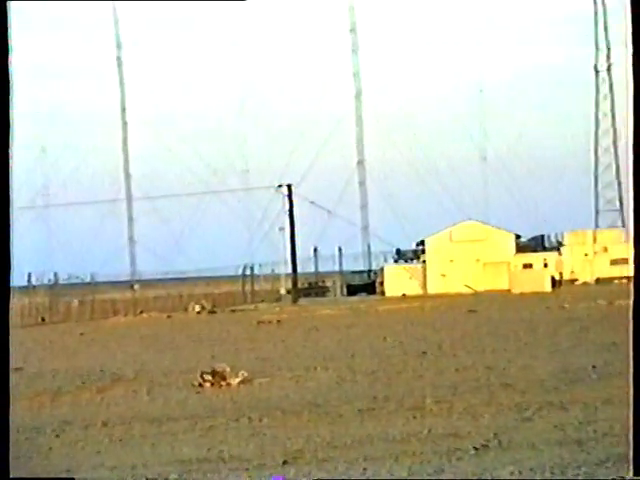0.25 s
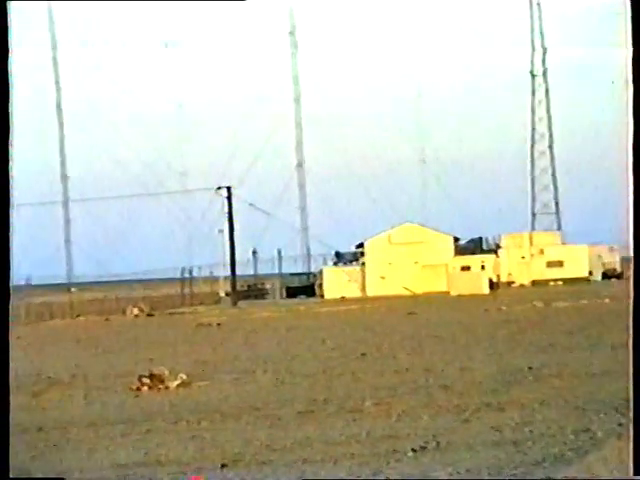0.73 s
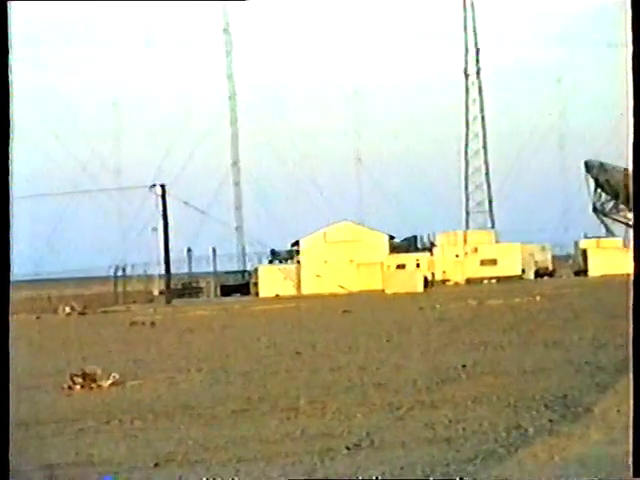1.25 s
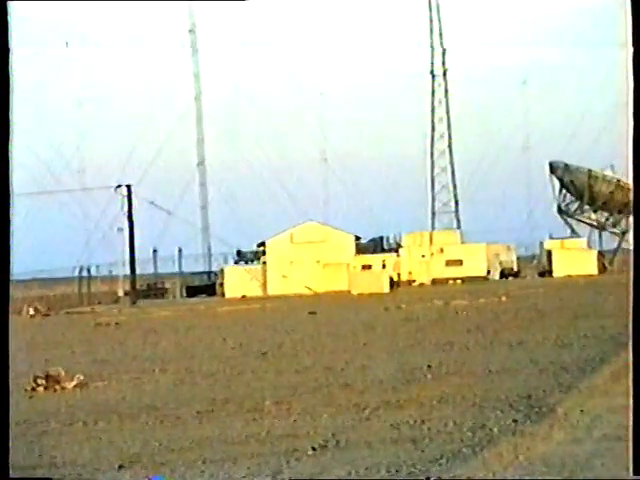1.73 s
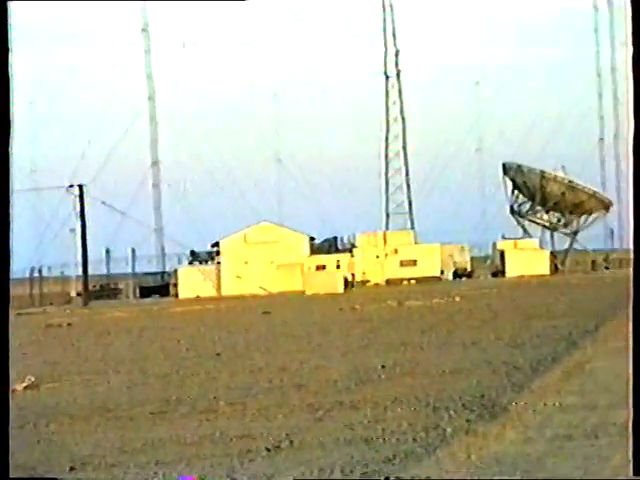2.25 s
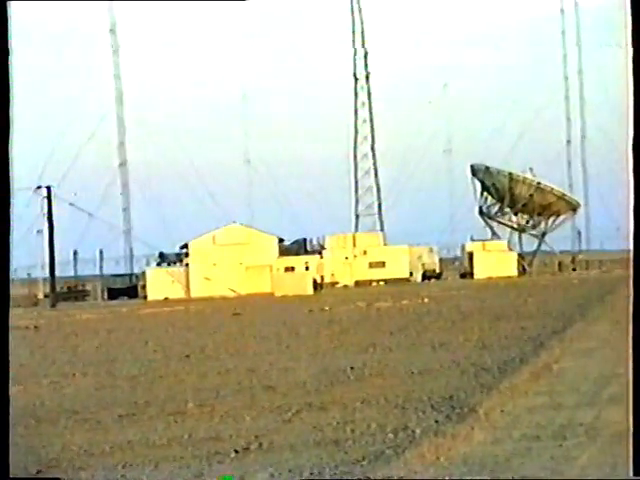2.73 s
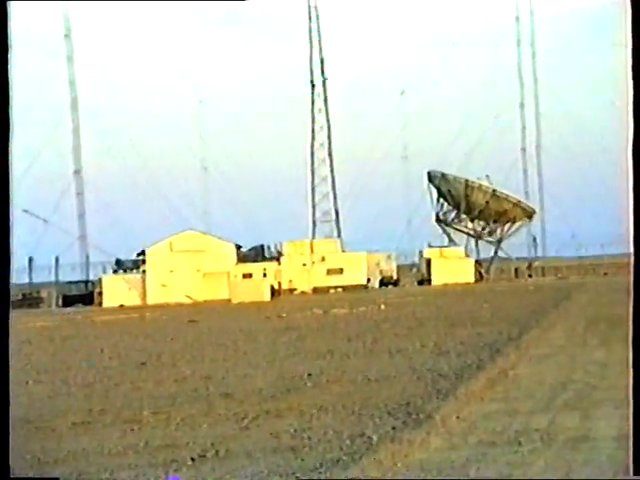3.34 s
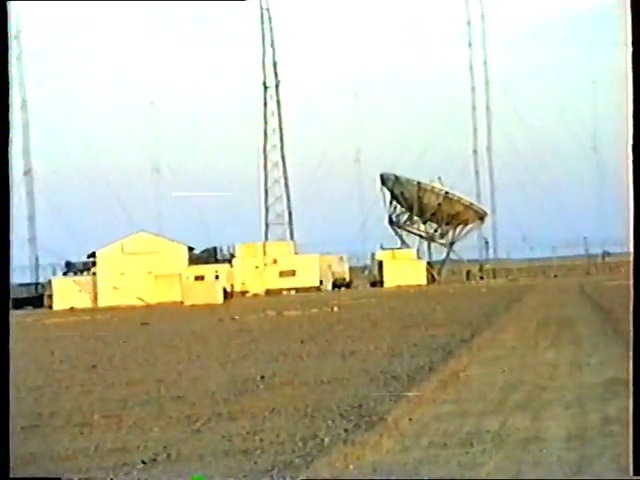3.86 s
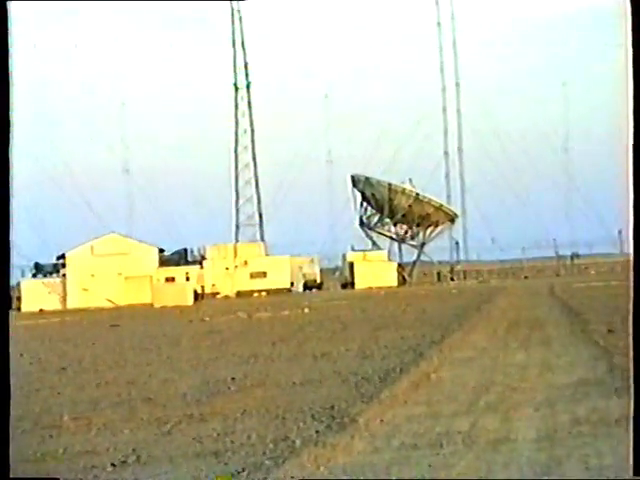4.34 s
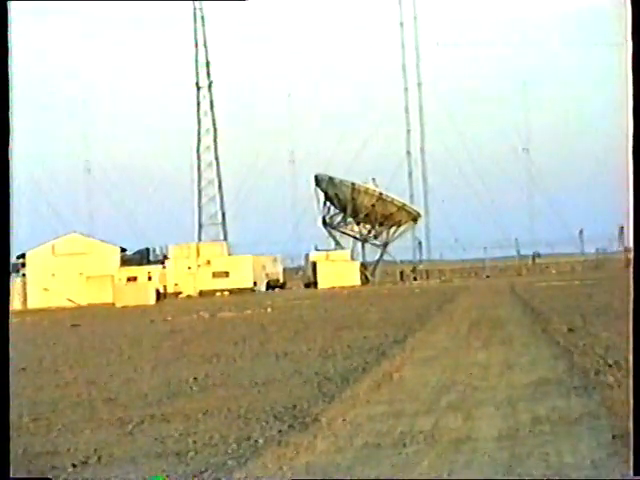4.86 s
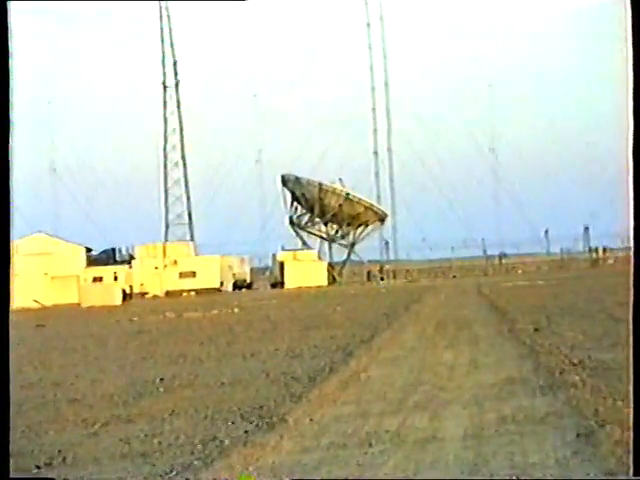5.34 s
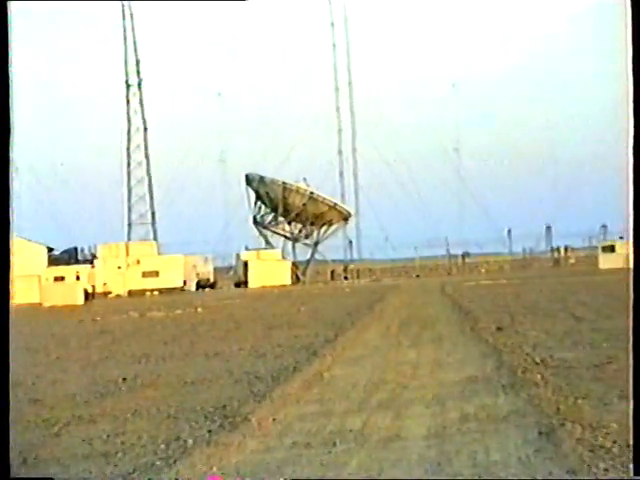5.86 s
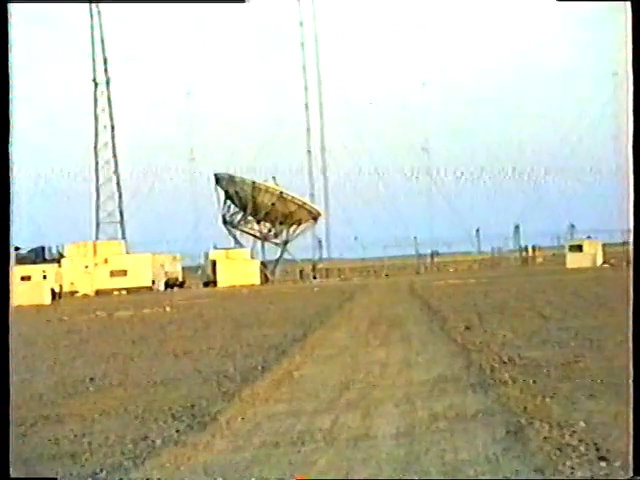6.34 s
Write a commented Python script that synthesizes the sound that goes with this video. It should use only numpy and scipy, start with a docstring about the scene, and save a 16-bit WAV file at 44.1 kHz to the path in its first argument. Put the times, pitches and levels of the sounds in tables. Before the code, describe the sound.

Wind blows straight onto a camcorder microphone in open desert, making a low, uneven rumble full of soft thumps and fluttering flurries. It sounds wide and slightly hollow, eases briefly past the middle, then gusts hardest near the end. Far beneath it are a soft rush of air over the plain and the camera's own faint hiss and whine, with a tiny tick, a light scuff and a brief buzz.

```python
"""Open desert, with the wind blowing straight onto the two microphone ports of a tape camcorder.
Gusts drive a low, uneven rumble with thumps and flurries, wide in the ears and slightly hollow in
the centre. Behind it lies the soft rush of air over the plain. Close by and faint are the camera's
own sounds: hiss, the whine of the tape drum, a thin whistle, a tick, a scuff and a brief buzz."""
import sys
import numpy as np
from scipy import signal
from scipy.fft import rfft, irfft, next_fast_len
from scipy.io import wavfile
from scipy.ndimage import uniform_filter1d

SR = 44100
rng = np.random.default_rng(int(sys.argv[2]) if len(sys.argv) > 2 else 0)


def store_wav(level_fs):
    """Save 16-bit WAV to argv[1]."""
    pcm = np.round(np.clip(np.atleast_2d(level_fs), -1, 1) * 32767)
    wavfile.write(sys.argv[1], SR, pcm.T.astype(np.int16))


N = 290881
TIME = np.arange(N) / SR
SIZE = next_fast_len(N + SR // 10)
FREQS = np.maximum(np.arange(SIZE // 2 + 1) * SR / SIZE, 1)
DRUM_HZ = 150  # turning rate of the tape drum

# single strong eddies that thump the ports:
# (time [s], level [dB], pitch [Hz], half length [s], left minus right [dB])
EDDIES = [(0.29, -21, 130, 0.012, 11), (0.483, -19.5, 127, 0.009, 5), (.547, -22, 124, .009, 12),
          (0.77, -20, 124.3, 0.0081, 19), (0.807, -23, 128.5, .01, 11), (0.947, -19.5, 128, 0.011, 11),
          (.983, -19.5, 123.4, 0.0081, 12), (1.061, -20, 189, 0.018, 1.5),
          (1.151, -20, 129.3, 0.0069, 12.5), (1.182, -22.5, 127, 0.0065, -0.5),
          (1.217, -18, 125.7, 0.0067, 13), (1.47, -20, 126, 0.031, 7), (1.585, -17.5, 124, 0.017, 8),
          (1.778, -20.5, 180, 0.011, 14), (1.842, -19, 122.1, 0.016, 8), (1.888, -20.5, 124.2, 0.014, 0),
          (2.008, -19.5, 136.6, 0.011, 11), (2.201, -28, 128.4, 0.0072, 7), (2.269, -21, 122, 0.023, 4),
          (2.309, -19, 165, 0.0082, -10), (2.437, -22, 124, 0.008, 1), (2.559, -21.5, 128, 0.017, 0),
          (2.609, -18.5, 124, 0.008, -2), (2.648, -20.5, 258, .011, 1.5), (2.789, -17, 123.7, 0.0099, 4.5),
          (2.85, -17.5, 122.2, 0.008, -7), (2.939, -20.5, 181.9, .01, -1.5), (3.007, -16, 127.3, 0.011, -1),
          (3.048, -16, 127.8, 0.011, 9), (3.128, -21.5, 248, 0.013, 9.5), (3.228, -23, 122.9, .01, 8),
          (3.262, -27, 400, .004, 5), (3.276, -19, 123.7, 0.017, 10), (3.506, -25.5, 127, 0.0055, 8),
          (3.68, -20, 123.8, 0.018, -5), (3.79, -21, 215, .011, 1.5), (3.992, -19, 130.8, 0.0077, -5),
          (4.304, -21.5, 128, 0.011, -1.5), (4.492, -13.5, 126.8, 0.018, -2),
          (4.55, -17.5, 129, 0.02, -0.5), (4.602, -16, 127.3, 0.016, -7.5), (4.648, -19.5, 193.2, 0.015, 5),
          (4.809, -22.5, 179.8, 0.01, 1), (4.946, -19.5, 129.9, .016, 3), (5.095, -18.5, 183, 0.011, 3),
          (5.292, -19, 127.2, 0.021, -7), (5.398, -17, 201.3, 0.0062, 8), (5.503, -14, 126, 0.0081, -3),
          (5.645, -17.5, 123.9, .016, -2), (5.717, -14.5, 126.7, 0.012, -3), (5.8, -18.5, 183, 0.008, 0),
          (5.833, -14.5, 125.8, 0.013, -8), (5.92, -22.5, 185.3, 0.017, -2), (5.968, -21, 126, 0.014, 1),
          (5.999, -16.5, 130.2, 0.0081, -1), (6.131, -17, 192, .012, -2.5), (6.23, -14, 132, 0.011, -3),
          (6.332, -16, 186, 0.011, -7.5), (6.524, -19, 122, 0.011, -2.5)]


def undb(db):
    """Decibels to gain."""
    return 10 ** (np.asarray(db) / 20)


def rms(x):
    """Root mean square."""
    return np.sqrt(np.mean(x ** 2))


def curves(table):
    """The columns of a table of timed rows, one value a sample."""
    times, *columns = np.transpose(table)
    return [np.interp(TIME, times, column) for column in columns]


def bump(at_s, half_s):
    """A Gaussian swell and fade around a moment, 1 at the top."""
    out = np.zeros(N)
    near = slice(*np.searchsorted(TIME, [at_s - 5 * half_s, at_s + 5 * half_s]))
    out[near] = np.exp(-.5 * ((TIME[near] - at_s) / half_s) ** 2)
    return out


def colour(points):
    """Gain at every frequency from (frequency [Hz], level [dB]) points."""
    hz, db = np.transpose(points)
    return undb(np.interp(np.log(FREQS), np.log(hz), db))


def bell(hz, octaves):
    """Gain of a smooth band around a centre."""
    return np.exp(-.5 * (np.log2(FREQS / hz) / octaves) ** 2)


def shape(x, gain):
    """Filter a sound by a gain at every frequency."""
    return irfft(rfft(x, SIZE) * gain, SIZE)[..., :N]


def noise(gain):
    """Coloured noise of rms 1."""
    x = shape(rng.standard_normal(SIZE), gain)
    return x / rms(x)


def walk(rate_hz):
    """Random levels held 1 / rate_hz seconds and smoothed twice; rms 1."""
    hold = int(SR / rate_hz)
    steps = np.repeat(rng.standard_normal(N // hold + 1), hold)
    smooth = uniform_filter1d(uniform_filter1d(steps, hold), hold)[:N]
    return smooth / rms(smooth)


def stereo(mid, side):
    """Left and right from their common and opposed parts."""
    return np.array([mid + side, mid - side])


def wide_noise(gain, side_db):
    """Coloured stereo noise, widened by an independent side signal."""
    return stereo(noise(gain), undb(side_db) * noise(gain))


def air(sigh_trim_db=-0.5, sigh_width_hz=240, swell_db=1.0):
    """Air rushes over the plain, mostly in the centre; a broad sigh wanders through it."""
    # swell of the rush: (time [s], level [dB])
    rush_levels = [(0, -64), (.2, -67), (.5, -66.5), (.9, -65), (1.45, -66.5), (2.1, -65.5), (2.8, -65),
                   (3.4, -67.5), (3.9, -64.5), (4.45, -66.5), (5.2, -67), (5.65, -64), (6.1, -66),
                   (6.6, -65.5)]
    # spectrum of the rush: (frequency [Hz], level [dB])
    rush_spectrum = [(200, -7), (900, -1), (1500, 0.5), (2000, -4), (2480, -2.5), (2700, -10), (2950, -7.5),
                     (3350, -17.5), (5000, -26.5), (9000, -45.5)]
    # path of the sigh: (time [s], centre [Hz], level [dB])
    sigh_path = [(0, 1700, -70), (.22, 1646, -74), (.45, 1497, -63.5), (.75, 1423, -68.5), (.95, 1412, -67),
                 (1.5, 1340, -75), (1.9, 1623, -69.5), (2.4, 1750, -73), (2.7, 1648, -66.5),
                 (3.1, 1606, -67), (3.4, 1805, -75), (3.88, 2150, -65.5), (4.45, 1894, -72.5),
                 (5.2, 1900, -71.5), (5.62, 1952, -65), (5.9, 1484, -66.5), (6.3, 1860, -72.5)]
    rush_db, = curves(rush_levels)
    sigh_hz, sigh_db = curves(sigh_path)
    low_band = noise(np.exp(-.5 * (FREQS / sigh_width_hz) ** 2))
    sigh = low_band * np.cos(2 * np.pi * np.cumsum(sigh_hz) / SR)  # shifted up to the moving centre
    rush = undb(rush_db) * wide_noise(colour(rush_spectrum), side_db=-8)
    return (rush + sigh * undb(sigh_trim_db + sigh_db)) * undb(swell_db * walk(9.7))


def whistle(pitch_hz=8000, level_db=-97, waver_db=0.5):
    """A thin steady whistle from the camera's electronics."""
    return np.sqrt(2) * undb(level_db + waver_db * walk(5)) * np.sin(2 * np.pi * pitch_hz * TIME)


def hiss(level_db=-73.5, rasp_depth=0.54, sharpness=6):
    """An even hiss with a slight rasp once per turn of the drum."""
    # spectrum of the hiss: (frequency [Hz], level [dB])
    spectrum = [(1000, -3), (3000, 0.5), (4100, -1.5), (5000, -3), (5700, -6.5), (8000, -8.5),
                (11000, -11.5)]
    rasp = 1 + rasp_depth * np.abs(np.sin(np.pi * DRUM_HZ * TIME)) ** sharpness
    return undb(level_db) * rasp / rms(rasp) * wide_noise(colour(spectrum), side_db=-5)


def drum_whine(wow=.0006, waver_db=1.5, side_db=-7):
    """The spinning tape drum whines through the camera body into the microphone."""
    # partials of the whine: (frequency [multiples of the turning rate], level [dB])
    partials = [(9.7, -83), (10, -81.5), (11, -79), (12, -78), (13, -81), (13.5, -83.5), (15, -86),
                (16, -83.5), (17.5, -83.5), (18.5, -90.5), (19, -90.5), (29, -99), (30, -90.5), (31, -95),
                (32, -95), (33, -97), (34, -93.5), (35, -99.5)]
    angle = 2 * np.pi * np.cumsum(DRUM_HZ * (1 + wow * walk(6))) / SR
    out = 0
    for multiple, db in partials:
        phase = multiple * angle + rng.uniform(0, 2 * np.pi)
        tone = stereo(np.sin(phase), undb(side_db) * np.cos(phase))
        out += undb(db + waver_db * walk(6.4)) * tone
    return np.sqrt(2) * out


def buzz(at_s=3.86, half_s=0.035, level_db=-49, centre_hz=7000):
    """A faint bright buzz swells and fades, two clicks to each turn of the drum."""
    clicks = np.diff(np.floor(2 * DRUM_HZ * TIME), prepend=0)
    swell = undb(level_db) * bump(at_s, half_s)
    return shape(clicks * swell, bell(centre_hz, octaves=0.9))


def handling():
    """Light touches on the camera body, close to the ports: a tick, then a scuff."""
    # touches: (time [s], level [dB], centre [Hz], rise [s], decay [s], left minus right [dB])
    touches = [(2.078, -52, 2700, 0.00017, 0.00069, -2), (2.083, -70.5, 2700, 0.0027, 0.018, -1),
               (3.585, -66, 3800, .0013, 0.0083, 0), (3.59, -59.5, 2040, .006, 0.017, 5),
               (3.612, -62, 2000, .002, .012, 7)]
    out = 0
    for at_s, db, hz, rise_s, decay_s, pan_db in touches:
        age = np.maximum(TIME - at_s, 0)
        envelope = np.minimum(age / rise_s, 1) * np.exp(-np.maximum(age - rise_s, 0) / decay_s)
        gains = undb(db + np.array([[pan_db], [-pan_db]]) / 2)
        out += gains * envelope * wide_noise(bell(hz, octaves=0.6), side_db=-7)
    return out


def sizzle(rumble, pitch_hz=3900, pitch_db=-48.5, octave_db=-66):
    """A thin high sizzle rides on the gusts: sidebands of the rumble around a pitch and its octave."""
    phase = 2 * np.pi * pitch_hz * TIME
    return rumble * (undb(pitch_db) * np.cos(phase) + undb(octave_db) * np.cos(2 * phase))


def thumps(trim_db=-2.67, wobble=.12, skew=0.53, lag_rad=0.73):
    """Each strong eddy swings the pressure for a few lopsided cycles, harder and sooner at one port."""
    out = np.zeros((2, N))
    sides = np.array([[1], [-1]])
    uneven_time = np.cumsum(1 + wobble * walk(110)) / SR
    for at_s, db, hz, half_s, pan_db in EDDIES:
        near = np.abs(TIME - at_s) < .1
        lead = lag_rad * np.tanh(pan_db / 2) * sides
        phase = 2 * np.pi * (hz * uneven_time[near] + rng.random()) + lead
        swing = np.sin(phase + skew * np.sin(phase))
        pan = undb(sides * pan_db / 2)
        out[:, near] += undb(db + trim_db) * pan / pan.mean() * bump(at_s, half_s)[near] * swing
    return out


def slack_db(dip_db=-0.5, lead_s=0.038, dip_half_s=0.008, cover_db=-2.5):
    """The rumble slackens just before a thump and gives way while the eddy covers the port."""
    times = np.array(EDDIES)[:, 0]
    fresh = np.diff(times, prepend=0) > .07  # no other eddy has just struck
    before = sum(bump(at_s - lead_s, dip_half_s) for at_s in times[fresh])
    covered = sum(bump(at_s, half_s) for at_s, _, _, half_s, _ in EDDIES)
    return dip_db * before + cover_db * covered


def port(gust_db, fine_db, deep_db, split_hz=360, deep_hz=85, throb_db=1.5, flutter_db=1.05):
    """Turbulence at one microphone port: the largest eddies boom, big ones thud, small ones flutter."""
    # pressure spectrum of the turbulence: (frequency [Hz], level [dB])
    turbulence = [(12, -26.5), (22, -17.5), (40, -9.5), (70, -2.5), (115, -2), (200, -6), (320, -13),
                  (500, -22.5), (660, -29.5), (900, -38.5), (1250, -48), (2500, -88)]
    pressure = colour(turbulence)
    big_band, deep_band = (1 / np.sqrt(1 + (FREQS / hz) ** 8) for hz in (split_hz, deep_hz))
    small_band = np.sqrt(1 - big_band ** 2)
    throb = throb_db * walk(14)
    thud = noise(pressure * big_band)
    boom = (undb(deep_db) - 1) * shape(thud, deep_band)
    bass = (thud + boom) * undb(gust_db + throb)
    flutter = noise(pressure * small_band) * undb(fine_db + throb + flutter_db * walk(35))
    fade = np.clip(np.minimum(TIME, TIME[-1] - TIME) / .006, 0, 1)  # 6 ms at each end
    return (bass + flutter) * np.sin(np.pi / 2 * fade) ** 2


def hollow(x, echo=0.85, lag_s=.01368, thin_hz=110, dull_hz=800):
    """A short inverted repeat, thin in the bass and dull in the treble, cuts a row of notches."""
    delay = np.exp(-2j * np.pi * FREQS * lag_s)
    highpass = 1j * FREQS / (1j * FREQS + thin_hz)
    repeat = delay * highpass / np.hypot(1, FREQS / dull_hz)
    return shape(x, 1 - echo * repeat) / np.sqrt(1 + echo ** 2)


def wind(gust_trim_db=-0.74, fine_trim_db=-16.0, usual_db=-25, fine_growth=0.99, flurry_share=0.076,
         lean=0.93, fine_lean=0.96, side_db=0.26, thin_hz=45):
    """One wind right on the microphone drives both ports, each with its own eddies."""
    # strength of the wind at the ports: (time [s], level [dB])
    gusts = [(0, -27), (0.17, -30), (0.33, -29), (0.52, -27.5), (0.66, -25.5), (0.8, -27), (1.15, -24.5),
             (1.41, -25.5), (1.75, -24.5), (2.05, -23.5), (2.42, -26), (2.6, -23), (2.74, -24),
             (3.12, -22.5), (3.36, -28.5), (3.85, -27.5), (4.1, -29), (4.2, -25.5), (4.44, -28.5),
             (4.485, -22), (4.63, -22), (4.7, -27.5), (4.82, -26.5), (4.96, -24), (5.02, -29),
             (5.23, -27.5), (5.55, -23), (5.83, -20), (6.02, -21), (6.3, -23), (6.45, -25.5), (6.6, -22.5)]
    # which port faces the wind: (time [s], bias to the left [dB])
    windward = [(0, -4.5), (0.3, 3), (1.15, 2.5), (1.6, 1.5), (2.3, 0.5), (2.9, -4), (3.27, 1.5), (3.6, -1),
                (4.05, -1.5), (4.4, -1), (5.0, 2), (5.65, -7), (6.0, -4.5), (6.3, -4), (6.6, -9.5)]
    # deep bass within the rumble: (time [s], boost [dB])
    deep_bass = [(0, 4.5), (.7, 1.5), (1.2, -0.5), (1.85, 0), (2.85, 2), (4.0, 1), (4.6, 3), (5.8, -1.5),
                 (6.6, 1)]
    # brief flurries of small eddies: (time [s], extra flutter [dB], half length [s])
    flurries = [(0.265, 5, 0.031), (1.738, 4.5, 0.043), (2.093, 3, 0.026), (2.589, 6, 0.016),
                (2.653, 3, 0.022), (3.133, 0, 0.036), (3.261, 5.5, 0.008), (4.593, 1.5, 0.019),
                (4.817, 3, 0.019), (4.935, 3, 0.016), (6.089, 0.5, .04), (6.3, 2, 0.025)]
    # sudden lulls in the wind: (time [s], dip [dB], half length [s])
    lulls = [(0.095, -6, 0.013), (0.61, -6, 0.031), (1.432, -3.5, .012), (2.172, -3.5, 0.013),
             (2.798, -5, .018), (2.956, -9, 0.01), (3.082, -2.5, 0.013), (3.584, -2, 0.028),
             (4.274, -6.5, 0.012), (4.682, -2, .012), (5.016, -4.5, 0.011), (5.23, -4.5, .012),
             (5.752, -4, .01), (6.202, -7, 0.018), (6.463, -3.5, 0.0074)]
    strength_db, = curves(gusts)
    facing_db, = curves(windward)
    deep_db, = curves(deep_bass)
    flurry_db = sum(db * bump(at_s, half_s) for at_s, db, half_s in flurries)
    lull_db = sum(db * bump(at_s, half_s) for at_s, db, half_s in lulls)
    # flurries stir mostly the small eddies; lulls take more from the big ones
    gust_db = strength_db + flurry_share * flurry_db + lull_db + slack_db() + gust_trim_db
    fine_db = usual_db + fine_growth * (strength_db - usual_db) + flurry_db + lull_db / 2 + fine_trim_db
    tilt_db = lean * facing_db / 2
    left = port(gust_db + tilt_db, fine_db + fine_lean * tilt_db, deep_db)
    right = port(gust_db - tilt_db, fine_db - fine_lean * tilt_db, deep_db)
    # the centre is hollow and has less deep bass than the sides
    mid = shape(hollow((left + right) / 2), FREQS / np.hypot(FREQS, thin_hz))
    side = undb(side_db) * (left - right) / 2
    return stereo(mid, side)


def scene():
    """Wind on the microphone in front; the plain and the camera's own small noises behind."""
    rumble = wind() + thumps()
    return rumble + sizzle(rumble) + air() + hiss() + drum_whine() + whistle() + handling() + buzz()


def record(dry):
    """The camcorder cuts the top treble steeply."""
    top_hz = 11200
    return signal.sosfilt(signal.ellip(8, .2, 70, top_hz, fs=SR, output="sos"), dry)


dry = scene()
out = record(dry)
store_wav(out)
```